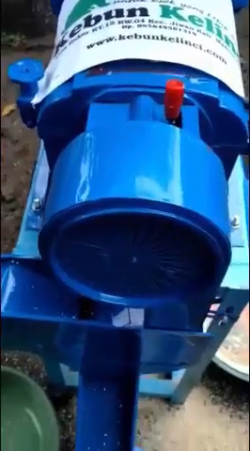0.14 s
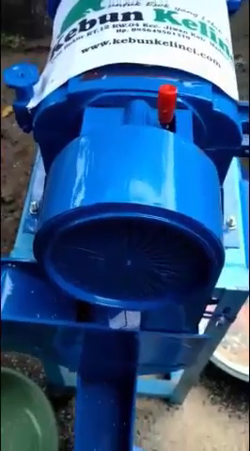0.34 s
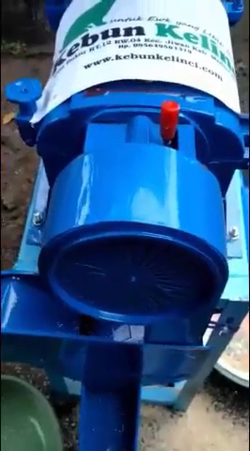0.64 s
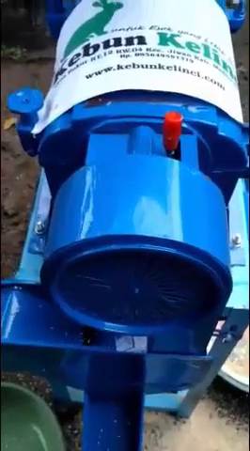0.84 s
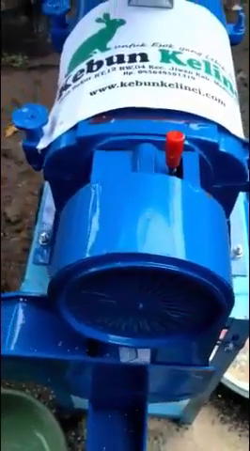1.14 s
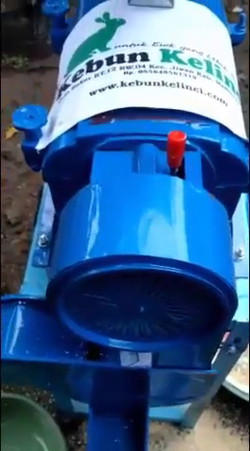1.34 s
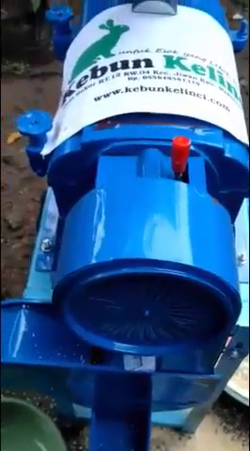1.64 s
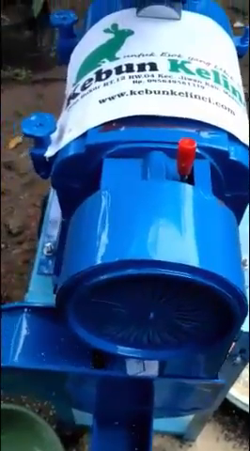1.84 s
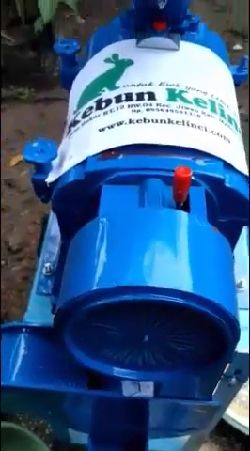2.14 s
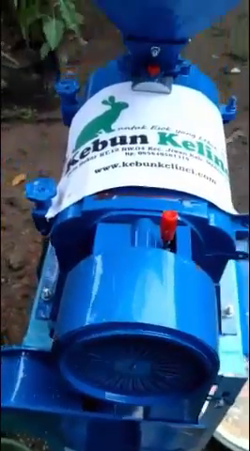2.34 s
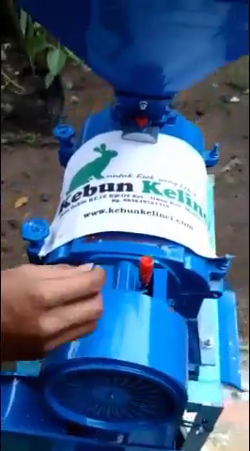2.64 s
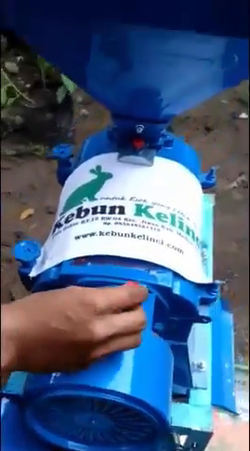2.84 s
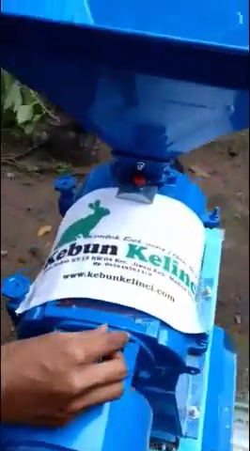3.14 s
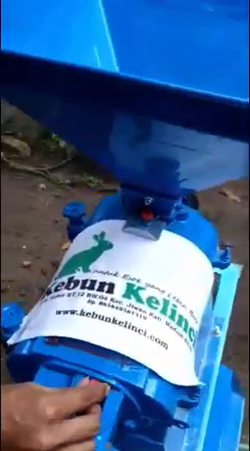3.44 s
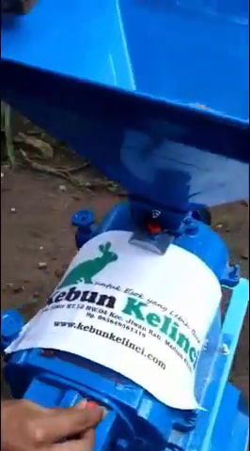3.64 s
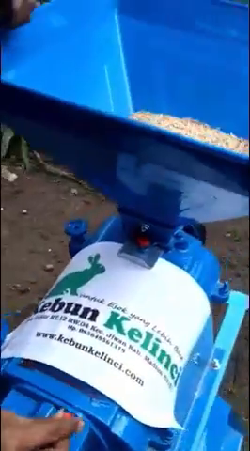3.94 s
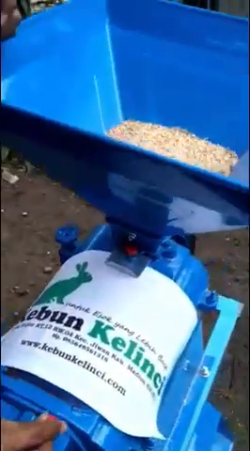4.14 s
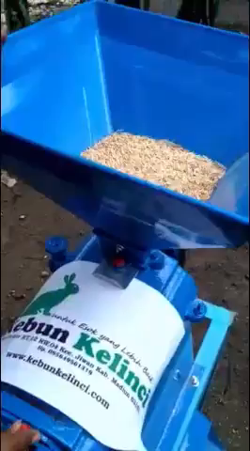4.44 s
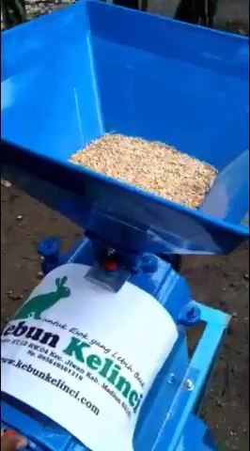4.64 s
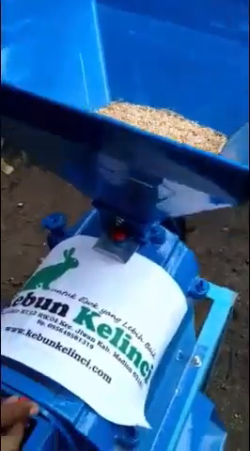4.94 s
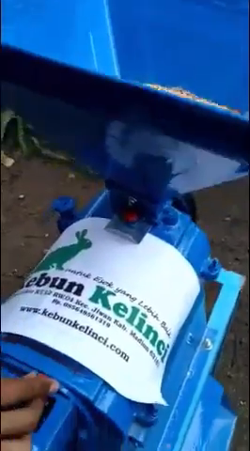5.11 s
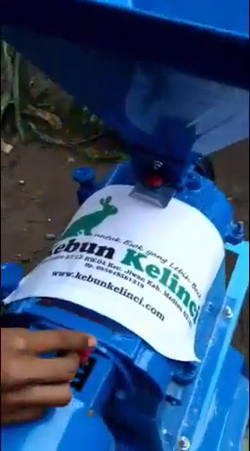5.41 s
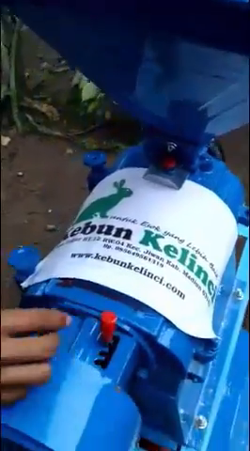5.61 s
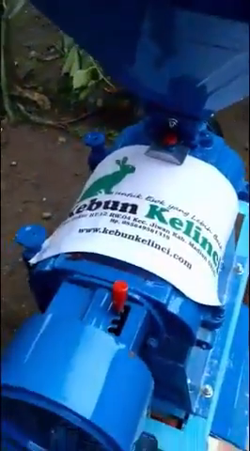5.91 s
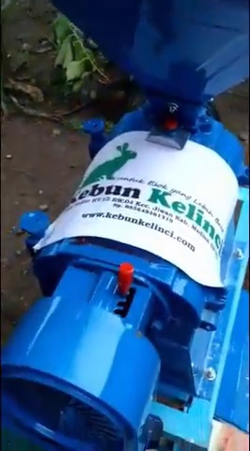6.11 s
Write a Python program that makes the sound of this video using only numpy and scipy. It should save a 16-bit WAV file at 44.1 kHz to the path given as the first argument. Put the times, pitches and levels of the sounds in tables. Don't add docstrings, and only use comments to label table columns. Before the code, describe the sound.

From 0 to about 6.3 seconds a small single-cylinder engine drives a grain mill, already running and never stopping. It fires about 29 times a second, very evenly, each firing a low woody knock of block and frame followed by a hollow exhaust pop, fusing into a rough, buzzing drone. Over it lies a dense, bright, sandy rattle of kernels on metal and a broad blower roar pulsing with the firings, coloured by ringing sheet metal. A faint whistle near 1300 hertz wavers beneath, swelling clearly from 2.2 to 3.4 seconds. Between 2.2 and 4 the grain rattle dips slightly, then recovers. As the close stereo microphones lift and turn after 2 seconds, the tone and stereo image shift, most around 4 to 5. Soft low wind rumble becomes lumpier, with puffs near 3.7, 4.6, 5 and 5.7. Dry open yard, slightly dulled top; it ends still running.

```python
import sys
import numpy as np
from scipy import signal
from scipy.fft import rfft, irfft, next_fast_len
from scipy.io import wavfile
from scipy.ndimage import map_coordinates

SR = 44100
rng = np.random.default_rng(int(sys.argv[2]) if len(sys.argv) > 2 else 0)


def invert_db(level):
    return 10 ** (np.asarray(level, dtype=float) / 20)


def digitize_waveform(pressure):
    field = np.atleast_2d(pressure).T
    bounded = np.clip(field, -1, 1)
    quanta = np.round(bounded * 32767).astype(np.int16)
    wavfile.write(sys.argv[1], SR, quanta)


N = 276507
TIME = np.arange(N) / SR
POP_SHARE = .558

# time in seconds, firings per second.
FIRING_RATE = [(0, 29.126), (6.27, 29.079)]
# time in seconds, lag of the left port in ms.
MIC_TURN = [(0, 0), (2.2, -.15), (2.6, -.33), (3.9, -.42), (5.3, -.42), (6.27, -.2)]
# time in seconds, height as a share of a full lift.
MIC_LIFT = [(0, 0.01), (1.8, 0.034), (2.9, 0.64), (4.2, 1.65), (5.2, 0.6), (6.27, 1.04)]


def rms_one(x):
    return x / np.sqrt(np.mean(x ** 2) + 1e-20)


def in_time(rows):
    s, *columns = np.transpose(rows)
    return [np.interp(TIME, s, c) for c in columns]


def at_hz(points, hz):
    point_hz, value = np.transpose(points)
    return np.interp(np.log(hz), np.log(point_hz), value)


def swells(rows):
    return sum(height * np.cos(np.pi / 2 * np.clip((TIME - s) / half_s, -1, 1)) ** 2
               for s, half_s, height in rows)


def drift(rate):
    r = np.exp(-80 * np.pi * rate / SR)
    slow = signal.lfilter([1], [1, -2 * r, r * r], rng.standard_normal(N // 40 + 2002))[2000:]
    return np.interp(np.arange(N) / 40, np.arange(len(slow)), rms_one(slow - slow.mean()))


def throb(cycle, share, depth_db):
    return invert_db(depth_db * np.exp(-((cycle - share) % 1) / .15))


def ring(clicks, hz, t60):
    r = invert_db(-60 / (t60 * SR))
    w = 2 * np.pi * hz / SR
    return signal.lfilter([0, np.sin(w)], [1, -2 * r * np.cos(w), r * r], clicks + 1e-18)


def engine(cycle, strength_db, jitter_s):
    # Hz, left level in dB, right level in dB, t60 in seconds,
    # polarity, dB change when the microphones are lifted.
    knock_modes = [(151.9, -16, -15.5, 0.13, -1, 0.3), (171.9, -26.5, -33, 0.15, 1, 5.5),
                   (350.3, -28.5, -48, 0.2, -1, -4.5)]
    # Hz, left level in dB, right level in dB,
    # t60 in seconds, polarity, dB change when the microphones are lifted.
    exhaust_modes = [(60.4, -38.5, -41, 0.25, 1, 3), (88.8, -43, -41, 0.6, 1, -4),
                     (112.2, -23.5, -18, 0.11, 1, -0.3), (229.9, -30, -21, 0.197, -1, -11.5),
                     (260.2, -30, -23, 0.11, -1, -3.5), (306, -34.5, -28.5, 0.081, -1, -20),
                     (377, -19, -31, 0.088, -1, -1), (408, -40, -53, 0.082, -1, 9),
                     (414, -49, -29, 0.11, -1, 6), (510, -26.5, -17.5, 0.054, -1, -2),
                     (575.6, -37, -32.5, 0.3, -1, -3), (646.4, -37, -29, 0.36, -1, -8)]
    # Hz, width in Hz.
    silencer_gap = (203, 41)
    run_in = SR // 2
    earlier = cycle[0] - FIRING_RATE[0][1] * np.arange(run_in, 0, -1) / SR
    cycle = np.r_[earlier, cycle]
    lift = np.pad(in_time(MIC_LIFT)[0], (run_in, 0), "edge")
    out = np.zeros((2, len(cycle)))
    for share, modes in ((.294, knock_modes), (POP_SHARE, exhaust_modes)):
        at = np.flatnonzero(np.diff(np.floor(cycle - share)))
        chance = rng.standard_normal((len(at), len(modes) + 2))
        late = np.round(chance[:, -1] * jitter_s * SR).astype(int)
        at = np.clip(at + late, 0, len(cycle) - 1)
        for k, (hz, left_db, right_db, t60, polarity, lifted_db) in enumerate(modes):
            scatter_db = strength_db * (chance[:, -2] + hz / 400 * chance[:, k])
            clicks = np.zeros(len(cycle))
            clicks[at] = np.sign(polarity) * invert_db(scatter_db + lifted_db * lift[at])
            out += ring(clicks, hz, t60) * invert_db(np.array([[left_db], [right_db]]))
    side = (out[0] - out[1]) / 2
    low_side = signal.sosfiltfilt(signal.butter(4, 290, fs=SR, output="sos"), side)
    out = out - low_side * np.array([[1], [-1]])
    gap_hz, width_hz = silencer_gap
    return signal.lfilter(*signal.iirnotch(gap_hz, gap_hz / width_hz, SR), out)[:, run_in:]


def at_two_ports(excite, low_hz, high_hz, patchy_db):
    # Hz, left-right likeness from 0 to 1.
    bass_likeness = [(60, 0.93), (190, 0.98), (270, 0.9), (400, 0.38), (520, 0.89), (650, 0.51),
                     (800, 0.36)]
    # centre in seconds, half length in seconds,
    # added likeness from 0 to 1, Hz.
    likeness_swells = [(2.72, .45, .56, 1500), (4.1, .18, .68, 1200), (4.5, .1, .8, 1200),
                       (4.76, .22, .8, 1200), (5.28, .13, .8, 1200)]
    bass_top_hz, treble_likeness, swell_octaves = 850, 0.073, .36
    lag_ms = in_time(MIC_TURN)[0]
    draws = np.array([[excite() for part in range(3)] for turn in range(2)])
    edges = low_hz * 2 ** (np.arange(int(3 * np.log2(high_hz / low_hz)) + 2) / 3)
    bass, treble, apart = 0, 0, 0
    together = drift(1.7)
    for k, (low, high) in enumerate(zip(edges, edges[1:])):
        middle_hz = np.sqrt(low * high)
        sos = signal.butter(2, [low, min(high, .45 * SR)], "band", fs=SR, output="sos")
        flicker_db = patchy_db * (.5 * together + drift(13.5))
        band = signal.sosfilt(sos, draws[k % 2]) * invert_db(flicker_db)
        in_bass = low < bass_top_hz
        if in_bass:
            alike = at_hz(bass_likeness, middle_hz)
        else:
            alike = treble_likeness * min(1, 2500 / high) * invert_db(2.5 * drift(.8))
        near_pitch = [(s, half_s, more * np.exp(-(np.log2(middle_hz / hz) / swell_octaves) ** 2))
                      for s, half_s, more, hz in likeness_swells]
        alike = np.clip(alike + swells(near_pitch), 0, 1 - 1e-4)
        shared = np.sqrt(alike) * band[0]
        if in_bass:
            bass = bass + shared
        else:
            treble = treble + shared
        apart = apart + np.sqrt(1 - alike) * band[1:]
    late = map_coordinates(treble, [np.arange(N) - lag_ms * SR / 1000], order=3, mode="nearest")
    return bass + apart + np.array([late, treble])


def coloured(x, spectrum, peaks=()):
    # Hz, left minus right in dB.
    port_lean = [(200, 3.5), (350, 3), (620, 1), (1120, -1.5), (1700, 3), (2300, 4), (2900, 0.5), (4000, 1),
                 (5000, 0.5), (11000, 1)]
    size = next_fast_len(N)
    hz = np.maximum(np.fft.rfftfreq(size, 1 / SR), 1)
    level_db = at_hz(spectrum, hz) + sum(db / (1 + (2 * (hz - f) / width) ** 2) for f, width, db in peaks)
    lean_db = at_hz(port_lean, hz) * (hz > 200) / 2 * np.array([[1], [-1]])
    return rms_one(irfft(rfft(x, size) * invert_db(level_db + lean_db), size)[:, :N])


def grain(cycle):
    # Hz, dB per Hz.
    rattle_spectrum = [(1500, -63), (2500, -8), (3400, -8.5), (4050, -10), (4700, -10.5), (5450, -9),
                       (6700, -14), (7200, -14.5), (7800, -10.5), (8350, -11.5), (8700, -12), (9600, -14.5),
                       (10400, -11.5), (11000, -15)]
    # centre in seconds, half length in seconds, dB.
    feed_lever = (3.1, 0.9, -1.5)

    def taps():
        luck, odds = rng.random(N), 12000 / SR
        strength = invert_db(2.0 * rng.exponential(1, N))
        return rms_one(strength * (luck < odds) * np.sign(luck - odds / 2))

    rattle = coloured(at_two_ports(taps, 2200, 11000, patchy_db=.2), rattle_spectrum)
    shaken = throb(cycle, .08, depth_db=1.2) * throb(cycle, POP_SHARE, depth_db=.8)
    return invert_db(-23.5 + swells([feed_lever])) * rattle * shaken


def blower(cycle):
    # Hz, dB per Hz.
    roar_spectrum = [(24, -64), (40, -42), (70, -12), (139, -9), (215, -12.5), (373, -6.5), (437, -7.5),
                     (945, -12.5), (1200, -9.5), (2340, -11), (3350, -22), (4080, -18.5), (4500, -27),
                     (5850, -67), (9900, -120)]
    # Hz, width in Hz, height in dB.
    housing_peaks = [(943, 155, 4.5), (1048, 47, 0.5), (1109, 21, 6), (1423, 25, 2), (1956, 36, 4.5),
                     (2340, 67, 1)]
    hiss = at_two_ports(lambda: rng.standard_normal(N), 43.93, 4500, patchy_db=0.5)
    air = coloured(hiss, roar_spectrum, housing_peaks)
    low = signal.sosfiltfilt(signal.butter(2, 248, fs=SR, output="sos"), air)
    pulsing = throb(cycle, .6, depth_db=1.4) * throb(cycle, .1, depth_db=1.4)
    puff_db = 1.5 * np.cos(2 * np.pi * (cycle - .65)) - 1.0
    return invert_db(-18.5) * ((air - low) * pulsing + low * invert_db(puff_db))


def whistle():
    # Hz, level in dB.
    blade_tone = [(1281, -35)]
    # centre in seconds, half length in seconds, dB.
    beam_swell = (2.79, 0.59, 13)
    hz, level_db = blade_tone[0]
    lead_s = -.65e-3 * in_time(MIC_TURN)[0] * np.array([[1], [0]])
    level_db = level_db - 8 + 1.7 * drift(9.6) + swells([beam_swell])
    phase = 2 * np.pi * hz * (TIME + lead_s) + .5 * drift(4.3)
    return np.sqrt(2) * invert_db(level_db) * np.sin(phase)


def breeze():
    # centre in seconds, dB above or below the calm.
    gusts = [(.56, -1), (.87, 2), (1.59, 2), (1.9, 4), (2.23, -2), (3.35, -18), (3.74, 7), (4.0, -7),
             (4.57, 7), (4.98, 13), (5.7, 9), (6.02, 5.5)]
    common_band = signal.butter(2, [36, 54], "band", fs=SR, output="sos")
    own_band = signal.butter(2, [80, 220], "band", fs=SR, output="sos")
    common = signal.sosfilt(common_band, rng.standard_normal(N))
    own = signal.sosfilt(own_band, rng.standard_normal((2, N)))
    own_db = -14.5 + 14.1 * in_time(MIC_LIFT)[0] + 2.5 * drift(6.5)
    gust_db = -41.5 + swells([(s, 0.093, db) for s, db in gusts])
    return invert_db(gust_db) * (rms_one(common) + invert_db(own_db) * rms_one(own))


def scene():
    cycle = np.cumsum(in_time(FIRING_RATE)[0]) / SR
    mill = grain(cycle) + blower(cycle) + whistle()
    return engine(cycle, strength_db=0.5, jitter_s=0.000085) + mill + breeze()


def band_limit(x):
    return signal.sosfilt(signal.butter(12, 12190, fs=SR, output="sos"), x)


def record(dry):
    rounded = 1.5 * np.tanh(dry / 1.5)
    cut = signal.sosfilt(signal.ellip(12, .2, 75, 10850, fs=SR, output="sos"), rounded)
    cut = signal.sosfilt(signal.butter(2, 45, "high", fs=SR, output="sos"), cut)
    return band_limit(cut)


dry = scene()
out = record(dry)
digitize_waveform(out)
```